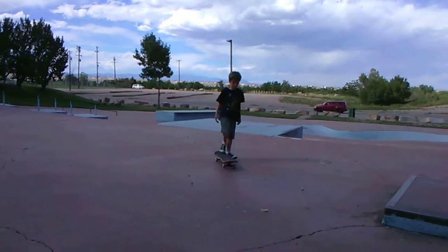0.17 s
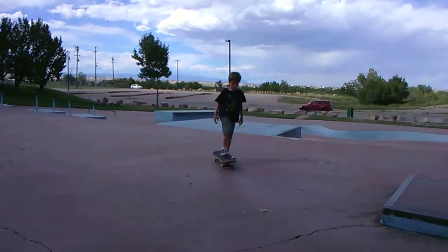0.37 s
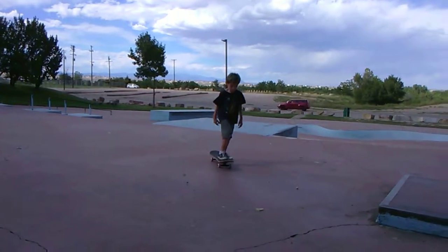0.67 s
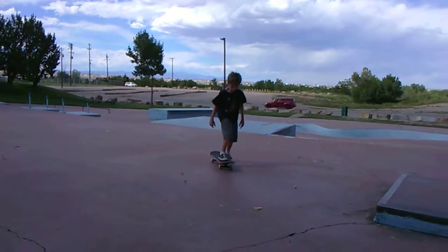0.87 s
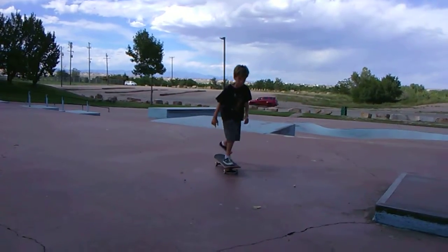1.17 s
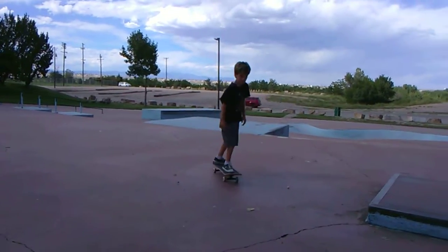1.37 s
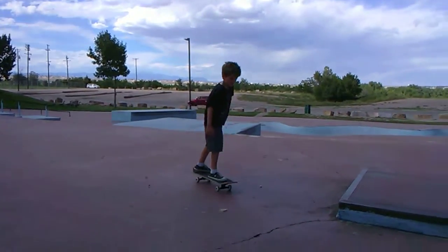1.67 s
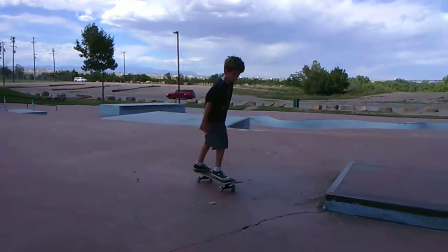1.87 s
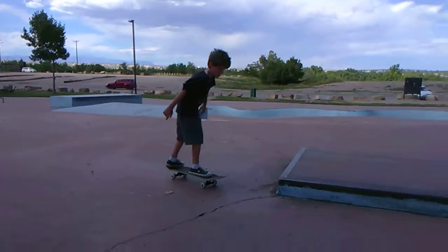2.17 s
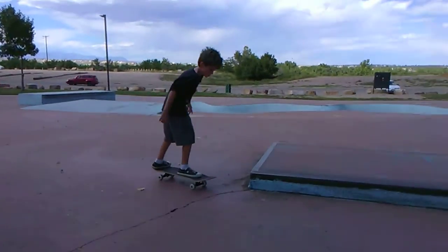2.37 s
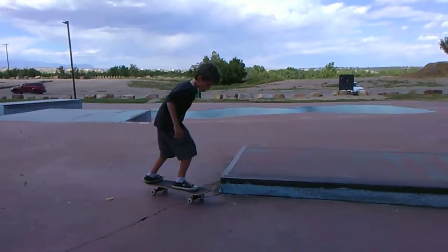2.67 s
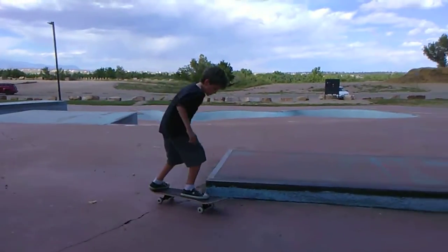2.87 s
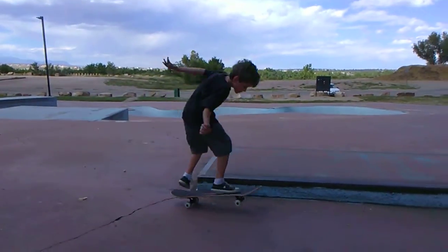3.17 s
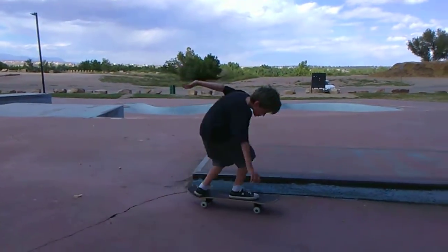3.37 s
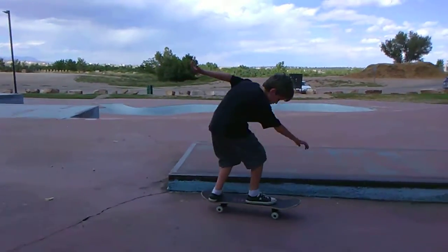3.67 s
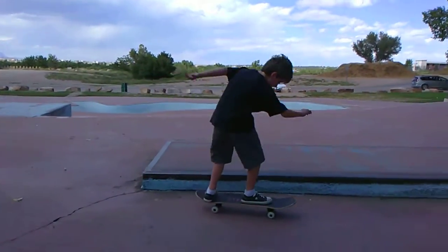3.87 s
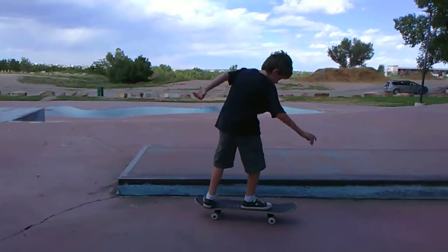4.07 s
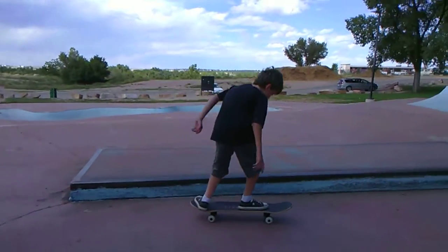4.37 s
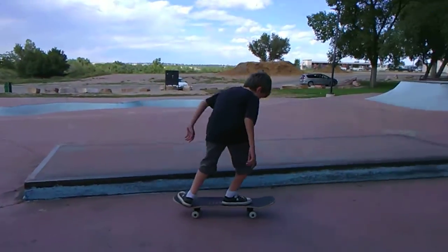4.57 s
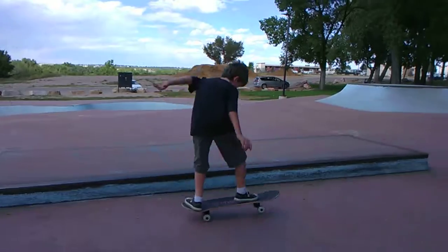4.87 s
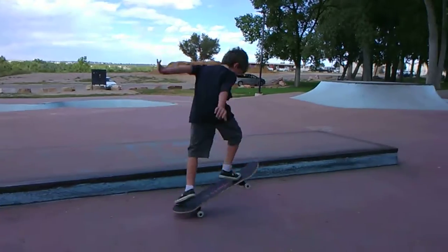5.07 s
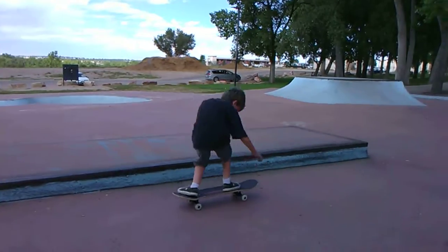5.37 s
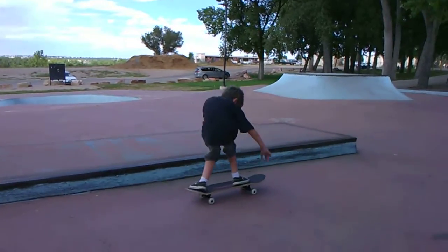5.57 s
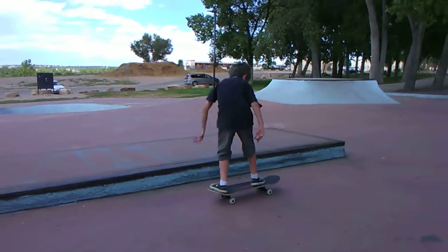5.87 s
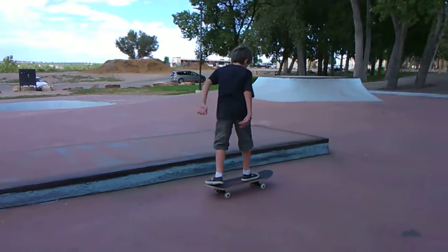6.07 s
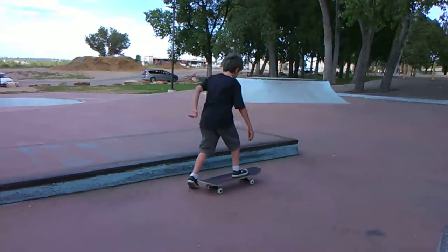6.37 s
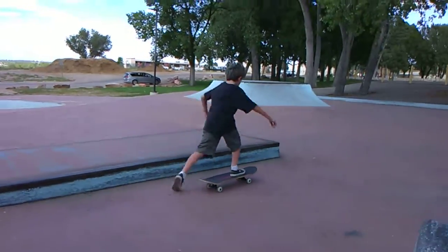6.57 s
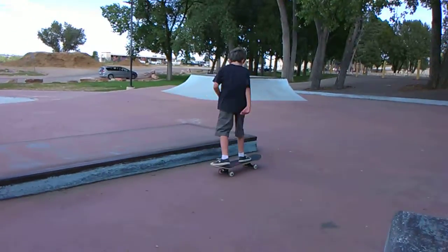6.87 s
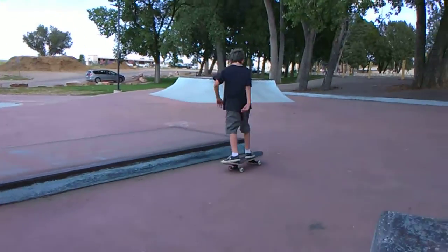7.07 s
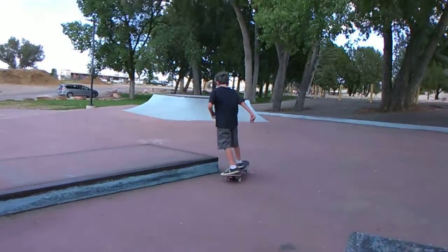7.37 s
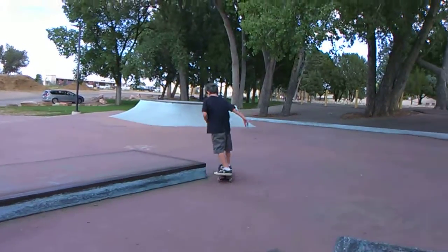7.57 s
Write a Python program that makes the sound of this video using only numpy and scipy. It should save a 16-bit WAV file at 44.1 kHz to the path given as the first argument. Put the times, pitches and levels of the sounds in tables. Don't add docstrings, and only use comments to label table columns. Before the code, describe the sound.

Outdoor concrete skatepark heard through a small stereo camera microphone. From 0 to 1.5 s it is quiet: dull distant air, faint shimmering insects, one pulsing about three times a second, light wheel ticks and low wind puffs on the right. At 1.7 s a gritty sole scuff and woody knock, repeated at 2.15 s, with a small tap at 2.9 s. Rolling roughens around 3.1 s, then at 3.35 s the board slams the concrete: a very loud, dry, woody crack with sand grit and short echo. Soft rolling, small ticks and wind follow. At 5.3-5.4 s comes a second loud slam, brighter, a rapid clatter of several blows. A faint engine hum swells behind. A smaller knock sounds at 6.2 s, when wind turns into heavy thumping buffets, mostly left. Push-off rumble at 6.5 s, then rough rolling, scrapes and crackling clacks at 7.0-7.6 s.

```python
import sys
import numpy as np
from scipy import signal
from scipy.fft import rfft, irfft
from scipy.io import wavfile
from scipy.ndimage import uniform_filter1d

SR = 44100
rng = np.random.default_rng(int(sys.argv[2]) if len(sys.argv) > 2 else 0)


def store_wav(level_fs):
    pcm = np.round(np.clip(np.atleast_2d(level_fs), -1, 1) * 32767)
    wavfile.write(sys.argv[1], SR, pcm.T.astype(np.int16))


def how_loud(loudness_db):
    steps = np.asarray(loudness_db, float) / 20
    return 10 ** steps


N = 340042
TIME = np.arange(N) / SR

# freq_hz, density_db
AIR_COLOUR = [(88, -20), (150, 0), (238, -1), (525, -19), (803, -22), (1300, -38.5), (3160, -22),
              (3480, -30.5), (3900, -31.5), (5850, -33.5), (6700, -21.5), (8300, -26.5), (11500, -31),
              (13600, -31.5), (15100, -61.5)]
# centre_hz, width_hz, first_db, later_db
INSECT_CHOIR = [(3960, 480, -78, -72), (4973, 150, -76, -74.5), (5630, 230, -74.5, -74.5),
                (6130, 150, -76.5, -82)]
# time_s, level_db
ENGINE_DRONE = [(3.2, -78), (3.5, -70), (4.1, -68.5), (5.2, -74.5), (5.5, -58.5), (6.1, -64), (6.4, -94.5)]
# time_s, level_db
THROB_LEVEL = [(0, -73), (2.6, -73), (3.3, -83), (7.71, -86)]
# time_s, left_db, right_db
WIND_LEVEL = [(0, -60.5, -59.5), (.6, -57.5, -56), (.9, -62, -44.5), (1.4, -56, -41.5), (1.6, -72, -63.5),
              (2.0, -54, -59.5), (2.39, -50.5, -50.5), (3.29, -52, -59), (3.56, -58.5, -62),
              (3.7, -36, -44), (4.19, -36, -50.5), (4.49, -56.5, -59), (5.09, -47, -59.5),
              (5.39, -34.5, -49.5), (5.99, -40, -59), (6.29, -43.5, -49), (6.88, -38.5, -35),
              (7.71, -45, -48.5)]
# freq_hz, density_db
GUST_COLOUR = [(20, -22.5), (45, 13), (75, 11), (120, 5), (170, -6), (300, -54)]
# freq_hz, density_db
GUST_EDGE_COLOUR = [(120, -19), (200, 3), (350, -4.5), (600, -12.5), (1000, -30.5), (2000, -61),
                    (5000, -110)]
# peak_s, level_db, pitch_hz, length_s
EDDIES_LEFT = [(2.225, -45.5, 80.1, 0.25), (3.214, -36, 79.4, 0.012), (3.267, -32, 72, 0.029),
               (3.358, -28.5, 120.5, 0.028), (3.665, -34, 79.3, 0.096), (3.92, -33.5, 86.7, 0.018),
               (4.095, -29, 77.4, 0.057), (4.298, -34, 83.6, 0.023), (4.964, -40.5, 95.2, 0.028),
               (5.205, -32, 171, 0.025), (5.361, -23, 139.4, 0.062), (5.423, -26.5, 66, 0.059),
               (5.482, -28.5, 99.8, .015), (5.508, -31.5, 198, 0.015), (5.538, -27, 210.3, 0.021),
               (5.57, -32, 166, 0.012), (5.626, -28, 201.4, 0.016), (5.649, -28.5, 139, 0.013),
               (5.667, -26, 66, 0.033), (5.746, -34.5, 128, 0.016), (5.772, -27, 150.1, 0.015),
               (5.788, -26.5, 100.4, 0.017), (5.97, -30, 85, 0.015), (6.028, -29.5, 86.8, 0.036),
               (6.176, -18.5, 180.1, 0.013), (6.205, -19, 110.2, 0.041), (6.386, -29.5, 210.5, 0.029),
               (6.265, -25.5, 108.3, 0.02), (6.302, -14.5, 120.5, 0.031), (6.342, -20.5, 90.1, 0.027),
               (6.482, -26.5, 167.4, 0.018), (6.611, -27, 120.7, 0.023), (6.693, -19.5, 179.4, 0.024),
               (6.76, -20.5, 214.8, .022), (6.793, -15, 71.9, 0.031), (6.879, -22.5, 198.6, 0.049),
               (6.958, -16, 200.3, 0.018), (6.98, -12.5, 110.1, 0.02), (7.185, -18, 148.4, 0.033),
               (7.213, -16, 167.9, 0.02), (7.352, -23, 82.7, 0.029), (7.54, -32, 231.5, 0.029),
               (7.515, -21.5, 102, 0.016)]
EDDIES_RIGHT = [(.716, -51, 71, 0.012), (.926, -53, 75.5, .014), (.98, -33, 73.5, 0.028),
                (1.125, -30.5, 98.1, 0.026), (1.284, -52, 74, 0.014), (2.374, -42, 91.5, 0.016),
                (2.45, -40.5, 87.8, 0.034), (2.952, -35.5, 94, 0.014), (3.125, -35, 83.2, 0.025),
                (3.354, -25, 143.3, 0.017), (3.671, -38.5, 61.8, 0.13), (4.138, -29, 93.3, 0.027),
                (4.203, -33.5, 101, 0.019), (5.352, -33, 151.1, 0.045), (6.082, -35, 80.9, 0.041),
                (6.365, -34.5, 90, 0.062), (6.572, -29.5, 79.7, 0.024), (6.772, -42.5, 89.7, 0.048),
                (7.026, -22.5, 80.5, 0.033), (7.259, -25, 62, 0.057), (7.345, -35.5, 81.2, 0.022),
                (7.414, -33, 77, 0.0097), (7.475, -29, 88, 0.039), (7.594, -34, 154, 0.011)]
# start_s, level_db, pitch_hz
AIR_SLAPS = [(5.63, -37.5, 490), (6.172, -31, 331.6), (6.209, -23.5, 602), (6.765, -22, 326),
             (6.857, -28.5, 330), (6.899, -29, 606), (6.265, -26, 328), (6.29, -22, 323), (6.296, -16, 330),
             (6.337, -21.5, 329), (6.351, -25, 332), (6.477, -25.5, 333), (6.603, -26, 335),
             (6.693, -24, 337), (6.704, -17.5, 334), (6.956, -16.5, 327.5), (6.975, -19, 342),
             (7.178, -15, 326), (7.184, -15, 336), (7.345, -30, 332), (7.477, -29, 330),
             (7.508, -13.5, 109)]
# freq_hz, gain_db
ECHO_COLOUR = [(300, -8.0), (1500, -10.0), (2900, -1), (4000, -2.0), (8000, -5.0), (14000, -11.0)]
# freq_hz, difference_db
NEAR_PORT_DB = [(300, 1), (2500, 2), (3500, 0), (5500, 1), (7500, 1), (8500, -5), (9500, -13), (10500, -3),
                (11500, 7), (13600, 13)]
# freq_hz, difference_db
FAR_SIDE_PORT_DB = [(2500, 1), (4500, -3), (7500, -10), (9500, -9), (11500, 1), (13600, 5)]
# freq_hz, likeness (1 = same)
PORT_COHERENCE = [(300, .97), (1000, .95), (2000, .8), (4000, .35), (8000, 0.), (14000, -.3)]
# freq_hz, density_db
HOUSING_COLOUR = [(1710, -53), (2900, -18.5), (3130, -13), (3640, -8.5), (3930, -8), (5000, -12.5),
                  (5390, -10.5), (6320, -10.5), (8380, -16), (9560, -4.5), (11500, -12), (13650, -5.5),
                  (15100, -36.5)]
# centre_hz, half_width_hz, depth_db
HOUSING_NOTCHES = [(2944, 61, -14), (3500, 33, -8), (5380, 80, -12), (8360, 170, -7.5), (10850, 87, -8)]
# time_s, level_db
ROLL_LEVEL = [(0, -80.5), (.8, -81), (1.4, -75), (2.1, -72.5), (2.7, -80), (3.2, -65.5), (4.1, -74.5),
              (4.5, -81.5), (5.1, -75), (6.4, -73.5), (7.0, -71), (7.71, -53.5)]
# middle_s, rise_db, half_length_s
ROUGH_PATCHES = [(1.564, 16.5, 0.096), (2.045, 13.5, 0.1), (3.067, 16, 0.11), (3.196, 7, 0.018),
                 (3.318, 8.5, 0.072), (3.432, 12, 0.14), (4.284, 13, 0.095), (4.944, 10.5, 0.16),
                 (5.79, 19, 0.033), (6.486, 17, 0.036), (6.54, 21.5, 0.058), (6.608, 15, 0.041),
                 (6.668, 14.5, 0.027), (6.994, 18, 0.15), (7.091, 16, 0.066), (7.194, 24, 0.096),
                 (7.459, 18.5, 0.1)]
# middle_s, level_db, half_length_s
TRUCK_GROWLS = [(1.43, -65.5, 0.14), (2.963, -73.5, 0.13), (4.913, -62.5, 0.22)]
# centre_hz, width_hz, level_db
WHEEL_MODES = [(555, 190, -7), (1150, 1300, 2), (1500, 240, 0.5), (2200, 970, -6)]
# centre_hz, width_hz, level_db
DECK_MODES = [(381, 69, 0), (645.8, 100, -1), (870, 130, 0.5), (1210, 170, -2.5), (1400, 140, -1),
              (1690, 210, 1.5), (2050, 250, 0.5), (2374, 260, -1)]
# start_s, level_db
SAND_GRAINS = [(0.9795, -57.5), (1.0575, -62.5), (1.1855, -60), (1.452, -49.5), (1.6321, -57),
               (2.4118, -52.5), (2.5641, -59.5), (2.7513, -49.5), (2.7895, -57.5), (2.8661, -53.5),
               (2.9877, -52.5), (3.0812, -25), (3.2001, -47), (3.2391, -54.5), (3.297, -41),
               (3.3316, -33.5), (3.3371, -36.5), (3.3692, -6), (3.5021, -37), (3.5131, -42.5),
               (3.6384, -61), (3.9131, -52.5), (4.3311, -54.5), (4.8148, -46.5), (5.6411, -56.5),
               (5.7888, -50.5), (6.0473, -56.5), (6.2989, -51.5), (7.1941, -27), (7.3181, -21),
               (7.451, -17), (7.2635, -19)]
# start_s, level_db, t60_s, pitch_hz
AFTER_BUZZES = [(3.3466, -22.5, .021, 3450), (3.378, -43.5, .55, 3100), (2.893, -58, .22, 11100),
                (3.088, -48, .1, 11400), (4.025, -60, .3, 12600), (4.821, -62.5, .24, 12900),
                (5.151, -57, .13, 11400), (6.163, -52, .13, 12900), (6.649, -57.5, .21, 11900),
                (4.886, -62, .38, 1520), (6.973, -54.5, .32, 11100), (6.976, -52, .5, 5300),
                (7.475, -48, .4, 5700), (7.485, -41, .3, 10400), (7.255, -53, .4, 5500),
                (5.412, -45, .42, 2650), (7.653, -46.5, .36, 10400), (7.272, -50, .32, 10900),
                (1.7, -47, .3, 5700), (6.2, -51, .25, 5700)]
# start_s, wood_db, grit_over_wood_db, pitch_hz
CRACK_TICKS = [(.0568, -33, -6, 1740), (.1378, -34.5, -24, 1680), (.7515, -39, -29, 1650),
               (1.0195, -37, -38, 1540), (1.081, -39, -39, 1690), (1.4172, -44.5, -26, 2200),
               (1.5404, -39.5, -37, 1500), (1.336, -53, -10, 2480), (1.3678, -51.5, -21, 2570),
               (2.0467, -46, -22, 1640), (2.44, -55, -1, 1150), (3.1968, -38, -26.5, 2220),
               (3.2826, -37, -16.5, 2200), (4.0155, -31, -11.5, 1270), (4.0643, -53, 2, 1495),
               (4.2783, -47, -7.5, 1580), (4.106, -48, -21, 2032), (5.137, -34, 1.5, 2012),
               (5.767, -43, -18, 1165), (5.8675, -50, -7, 1482), (5.9663, -52, -2.5, 1528),
               (6.4413, -42, -18, 1063), (6.5915, -37.5, -19, 974), (6.639, -42, 4, 2110),
               (6.641, -39, -32, 870), (6.519, -37, -20, 870), (6.528, -39, -25, 803),
               (6.549, -44, -15, 850), (6.61, -47, -17, 1710), (7.0658, -31.5, -25, 1660),
               (7.263, -20.5, -3.5, 2050), (7.3175, -58, 21, 1500), (7.455, -22.5, -29, 706),
               (7.705, -45, 11, 1710), (3.0126, -51, -22, 1710), (3.038, -38, -34, 750),
               (3.065, -35, -33, 890), (3.297, -40.5, -9.5, 900), (5.787, -53, 1, 1400),
               (4.18, -53, -12.5, 2005), (3.3685, -15.5, -9, 1710), (.0715, -48, -30, 1690),
               (1.6835, -33.5, 15, 2050), (1.7185, -42, 11, 2050), (5.725, -48.5, -30, 870),
               (6.975, -40.5, -3, 1500), (7.0113, -26, -24.5, 1060), (7.1355, -37, -40, 1276),
               (7.4305, -28.5, -32, 1694), (7.4505, -23.5, 8.5, 1400), (7.5847, -37, -27, 1720)]
# start_s, wood_db, grit_over_wood_db, pitch_hz, drag_s
SOLE_SCUFFS = [(1.668, -18, 5.5, 1260, 0.015), (1.68, -20, 6, 2200, 0.011),
               (1.694, -28.5, -6.5, 1720, 0.0036), (2.131, -18, 5.5, 1600, 0.003),
               (2.14, -20.5, -2.5, 1000, 0.0034), (2.152, -22, -15, 1810, 0.0021),
               (3.079, -26.5, -14, 935, 0.0065), (3.186, -41, -30, 993, .018),
               (6.98, -34.5, -18, 795, 0.021), (7.055, -37, -25, 870, 0.02), (7.112, -43, -44, 870, 0.012),
               (7.087, -33, -14, 870, 0.0096), (7.186, -25.5, -3.5, 1400, 0.0085),
               (7.2, -21.5, 0, 1500, 0.0188), (7.223, -20.5, -1, 1580, 0.014),
               (7.441, -32.5, 7, 1500, 0.0056), (7.458, -29, -2, 1250, 0.012),
               (7.474, -33.5, -8, 1114, 0.008), (7.612, -12.5, -6.5, 1500, 0.0055),
               (7.624, -17, -2.5, 1620, 0.012), (7.643, -20, -1, 1500, 0.0011),
               (7.615, -39, -15, 700, 0.0092)]
# start_s, wood_db, crack_over_wood_db, grit_over_wood_db, pitch_hz
DECK_SLAMS = [(1.724, -25, -5, -6, 1500), (1.8946, -34.5, -15, -26, 1500), (2.1605, -25, -6.5, -3, 1590),
              (2.8805, -34.5, -26, -14, 1280), (3.9419, -37, -20, -38.5, 1500),
              (4.9787, -38, -20, -16.5, 1500), (3.327, -32.5, -18.5, -25, 1003),
              (3.342, -22.5, -15, -18, 638), (3.346, 1.5, -4, -5, 702), (3.351, -5, -12, 3.5, 636.7),
              (3.373, -27, -5.5, -4, 2000), (3.426, -39.5, 5, 7, 627), (3.502, -75, 0, 18, 2000),
              (5.313, -27.5, -12, -19.5, 900), (5.319, 3, -7, -2.5, 1654), (5.335, -3.5, 1, -5.5, 1673),
              (5.3497, -3, -3.5, 3.5, 1889), (5.3865, -4.5, -7, 2, 1498), (5.401, -18, -28, -2, 1150),
              (6.159, -33.5, -24, -22, 470), (6.1938, -20, -8, -2, 1700), (5.328, -10, -7.5, -2.5, 2067),
              (5.343, -17.5, -10.5, 0, 1910), (5.36, -11, -7.5, -1, 1693), (3.357, -14.5, -10, 1, 900)]


def unit(x):
    return x / np.sqrt(np.mean(x ** 2))


def curves(table):
    time_s, *columns = np.transpose(table)
    return [np.interp(TIME, time_s, column) for column in columns]


def read(table, hz):
    freq_hz, value = np.array(table)[:, 0], np.array(table)[:, 1]
    return np.interp(np.log(hz + 1), np.log(freq_hz + 1), value)


def colour(x, db_of_hz):
    size = 4096
    cepstrum = irfft(np.log(how_loud(db_of_hz(np.arange(size // 2 + 1) * SR / size))))
    cepstrum[1:size // 2] *= 2
    cepstrum[size // 2 + 1:] = 0
    taps = irfft(np.exp(rfft(cepstrum)))
    taps = taps / np.sqrt(np.sum(taps ** 2))
    return signal.fftconvolve(np.atleast_2d(x), taps[None], axes=1)[:, :N]


def ring(x, modes):
    t = np.arange(2048) / SR
    taps = np.zeros(len(t))
    for k, (hz, width_hz, db) in enumerate(modes):
        decay = np.exp(-np.pi * width_hz * t)
        taps += (-1) ** k * how_loud(db) * np.sqrt(width_hz) * decay * np.sin(2 * np.pi * hz * t)
    taps = taps / np.sqrt(np.sum(taps ** 2))
    return signal.fftconvolve(x, taps[None], axes=1)[:, :x.shape[1]]


def walk(rate, channels=1):
    k = int(SR / rate)
    held = np.repeat(rng.standard_normal((channels, N // k + 1)), k, axis=1)
    return unit(uniform_filter1d(uniform_filter1d(held, k), k)[:, :N])


def port_noise():
    mid, side = rfft(rng.standard_normal((2, N)))
    like = np.clip(read(PORT_COHERENCE, np.arange(len(mid)) * SR / N), -1, 1)
    mid = mid * np.sqrt((1 + like) / 2)
    side = side * np.sqrt((1 - like) / 2)
    return irfft(np.array([mid + side, mid - side]), N)


def grit(rate, scatter_db):
    return unit(port_noise() * how_loud(scatter_db * walk(rate)))


def bump(middle_s, half_s):
    return np.clip(1 - np.abs(TIME - middle_s) / half_s, 0, 1)


def below(hz, edge_hz, octaves):
    return -40 * np.clip(.5 + np.log2((hz + 1) / edge_hz) / octaves, 0, 1) ** 2


def shimmer(hz, width_hz):
    phase = 2 * np.pi * np.cumsum(hz * (1 + .012 * walk(1.5)[0])) / SR
    pole = np.exp(-np.pi * width_hz / SR)
    slow = signal.lfilter([1], [1, -pole], rng.standard_normal((2, 2, N)))
    return unit(slow[0] * np.cos(phase) + slow[1] * np.sin(phase))


def distant_air():
    return how_loud(-66.5 + 1.5 * walk(4)) * colour(port_noise(), lambda hz: read(AIR_COLOUR, hz))


def engine_drone():
    return how_loud(curves(ENGINE_DRONE)[0]) * ring(port_noise(), [(231, 7.6, 2), (349, 1.2, -5.5)])


def insect_choir():
    choir = np.zeros((2, N))
    for hz, width_hz, first_db, later_db in INSECT_CHOIR:
        level_db = np.interp(TIME, [1, 2.2, 5.8, 7], [first_db, later_db, later_db, later_db - 5])
        choir += how_loud(level_db + 2 * walk(2) + 1.5 * walk(11)) * shimmer(hz, width_hz)
    return choir


def throbbing_insect():
    first_s, period_s, length_s = .29, .325, .04
    from_beat_s = (TIME - first_s + period_s / 2) % period_s - period_s / 2
    pulse = np.exp(-.5 * (from_beat_s / length_s) ** 2) * how_loud(curves(THROB_LEVEL)[0])
    return pulse * ring(rng.standard_normal((2, N)), [(6800, 1500, 0.0046), (8050, 980, 0.015)])


def background():
    return distant_air() + engine_drone() + insect_choir() + throbbing_insect()


def eddies(events):
    swing, edge = np.zeros((2, N))
    wobble, flutter = walk(90)[0], how_loud(3.5 * walk(80)[0])
    churn = colour(rng.standard_normal(N), lambda hz: read(GUST_COLOUR, hz / 2.1))[0]
    jolts = how_loud(6 * walk(160)[0]) * rng.standard_normal(N)
    for s, db, hz, length_s in events:
        at = slice(max(int((s - .15) * SR), 0), int((s + 0.2) * SR))
        late = (TIME[at] - s) / max(length_s, .01) + .15
        bell = np.exp(-np.where(late < 0, 5, 1.8) * late ** 2)
        cycles = np.sin(2 * np.pi * np.cumsum(hz * np.exp(.3 * wobble[at])) / SR)
        churn_share = np.clip((hz - 70) / 90, .25, 1)
        motion = bell * flutter[at] * (cycles + churn_share * churn[at])
        size = how_loud(db) * np.sqrt(np.mean(bell ** 2))
        swing[at] += size * unit(motion)
        edge_gain = how_loud(-17 + .7 * (db + 20)) * (hz / 100) ** .7
        edge[at] += size * unit(bell * jolts[at]) * edge_gain
    return swing + colour(edge, lambda hz: read(GUST_EDGE_COLOUR, hz))[0]


def air_slaps():
    gain_db, length_cycles, steepness = 6.5, 0.42, 5
    total = np.zeros(N)
    for s, db, hz in AIR_SLAPS:
        turn = (TIME - s) * hz - .75
        total += how_loud(db + gain_db) * np.exp(-(turn / length_cycles) ** 2) * -np.tanh(steepness * turn)
    return total


def wind():
    rumble = colour(rng.standard_normal((2, N)), lambda hz: read(GUST_COLOUR, hz))
    bed = unit(rumble * how_loud(2.8 * walk(14, channels=2)))
    single = np.array([eddies(EDDIES_LEFT) + air_slaps(), eddies(EDDIES_RIGHT)])
    blown = how_loud(np.array(curves(WIND_LEVEL))) * bed + single
    return signal.sosfilt(signal.butter(2, 38, "high", fs=SR, output="sos"), blown)


def park(x):
    ramps_t60_s, trees_t60_s, delay_s = 0.2, 0.098, 0.0094
    t = np.arange(SR // 2) / SR
    onset = np.clip(t / delay_s, 0, 1) ** 2
    scatter = port_noise()[:, :len(t)] * onset
    ramps = scatter * how_loud(-60 * t / ramps_t60_s)
    trees = ring(scatter[:, ::-1] * onset * how_loud(-19 - 60 * t / trees_t60_s), [(2900, 2400, 0)])
    echoes = (ramps + trees) / np.sqrt(np.sum(ramps[0] ** 2))
    wet = signal.fftconvolve(x, echoes, axes=1)[:, :N]
    return how_loud(-18.5) * colour(wet, lambda hz: read(ECHO_COLOUR, hz))


def notches(hz):
    return sum(db * np.exp(-((hz - centre_hz) / width_hz) ** 2) for centre_hz, width_hz, db in HOUSING_NOTCHES)


def shade(x, table):
    def share_db(hz, side):
        return 10 * np.log10(2 / (1 + how_loud(-2 * side * read(table, hz))))
    left = colour(x[0], lambda hz: share_db(hz, 1))[0]
    right = colour(x[1], lambda hz: share_db(hz, -1))[0]
    return np.array([left, right])


def wheel_rumble(level_db, rolling):
    rumble = ring(how_loud(level_db) * rolling, WHEEL_MODES)
    return signal.sosfilt(signal.butter(6, 2580, fs=SR, output="sos"), rumble)


def deck_hum(smooth_db, patch_db, rolling):
    patch_gain, first_db, fade_db_per_s = 1.4, -62, 26.5
    gain = how_loud(smooth_db - 9 + patch_gain * patch_db) + how_loud(first_db - fade_db_per_s * TIME)
    return ring(gain * how_loud(2.8 * walk(14)) * rolling, [(734, 40, 0.005), (900, 58, 0.0045)])


def truck_growl():
    gain = sum(how_loud(db) * bump(s, half_s) for s, db, half_s in TRUCK_GROWLS)
    return ring(gain * grit(57, 2.2), [(523, 370, 0)])


def after_buzz(shake):
    width_hz = 1400
    total = np.zeros((2, N))
    for s, db, t60_s, hz in AFTER_BUZZES:
        force = how_loud(db - 60 * np.clip(TIME - s, 0, 1) / t60_s) * (TIME >= s)
        total += colour(force * shake, lambda f: -np.minimum(6 * ((f - hz) / width_hz) ** 2, 60))
    return total


def sand_grains():
    gain_db, t60_s = -7, 0.0093
    total = np.zeros(N)
    for s, db in SAND_GRAINS:
        total += how_loud(db + gain_db - 60 * np.clip(TIME - s, 0, .1) / t60_s) * (TIME >= s)
    return total


def crack_band(hz):
    return read(HOUSING_COLOUR, hz) + below(hz, 8400 * 1.1, .4)


def grit_band(hz):
    return read(HOUSING_COLOUR, hz) + below(8400, hz * 1.1 + 1, .4)


def sand_crackle(contact_force, roll_db, patch_db):
    pebbles = unit(how_loud(1.5 * walk(150)))
    rolled = how_loud(roll_db - 7 + 0.15 * patch_db) * pebbles
    return colour((contact_force + sand_grains() + rolled) * grit(2200, 3.5), grit_band)


def contacts(events, deck, rise_s, hold_s, t60_s, focus_db, blow, shake):
    wood, power = np.zeros((2, N)), np.zeros((2, N))
    detune = 1 + .02 * rng.standard_normal((60, len(deck)))
    knocks_db = 4.5 * walk(160)[0]
    tail_db, tail_stretch = -15, 1.9
    for (s, wood_db, crack_db, grit_db, hz), hold, t60, stray in zip(events, hold_s, t60_s, detune):
        at = slice(int(s * SR), int((s + 0.15) * SR))
        t = TIME[at] - s
        fall_db = -60 * np.maximum(t - rise_s - abs(hold), 0) / max(t60, .005)
        shiver = how_loud(tail_db + fall_db / tail_stretch + knocks_db[at])
        force = how_loud(wood_db) * np.clip(t / rise_s, 0, 1) * np.maximum(how_loud(fall_db), shiver)
        modes = []
        for (mode_hz, width_hz, db), d in zip(deck, stray):
            octaves_off = min(abs(np.log2(mode_hz / hz)), 2.2)
            modes.append((mode_hz * d, width_hz, db - focus_db * octaves_off))
        drive = force * shake[:, at]
        drive[:, int(rise_s * SR)] += blow * np.sqrt(np.sum(force ** 2))
        rung = ring(drive, modes)
        wood[:, at] += rung * np.sqrt(2 * np.sum(force ** 2) / np.sum(rung ** 2))
        power[:, at] += (how_loud(np.array([[crack_db], [grit_db]])) * force) ** 2
    return wood, power


def with_crack(events, crack_db):
    s, wood_db, grit_db, hz = np.transpose(events)[:4]
    return np.transpose([s, wood_db, crack_db + 0.71 * grit_db, grit_db, hz])


def wheel_ticks(deck, shake):
    hold_s, t60_s = np.full(len(CRACK_TICKS), .004), np.full(len(CRACK_TICKS), .034)
    return contacts(with_crack(CRACK_TICKS, -11), deck, 0.0018, hold_s, t60_s, 20, 0.52, shake)


def sole_scuffs(deck, shake):
    drag_s, t60_s = np.array(SOLE_SCUFFS)[:, -1], np.full(len(SOLE_SCUFFS), 0.011)
    return contacts(with_crack(SOLE_SCUFFS, -8), deck, 0.0062, drag_s, t60_s, 8.5, 0.31, shake)


def deck_slams(shake):
    t60_s = 0.03 * how_loud(-0.05 * np.array(DECK_SLAMS)[:, 1])
    hold_s = np.full(len(DECK_SLAMS), .003)
    return contacts(DECK_SLAMS, DECK_MODES, .0006, hold_s, t60_s, 5.9, 0.59, shake)


def skateboard():
    shake, rolling = grit(600, 2.5), grit(120, 4)
    damped = DECK_MODES[:1] + DECK_MODES[2:]
    tick_wood, tick_power = wheel_ticks(damped, shake)
    scuff_wood, scuff_power = sole_scuffs(damped, shake)
    slam_wood, slam_power = deck_slams(shake)
    crack, sand = np.sqrt(slam_power + scuff_power + tick_power) * how_loud(-9.5)
    high_pass = signal.butter(4, 310, "high", fs=SR, output="sos")
    wood = signal.sosfilt(high_pass, slam_wood + scuff_wood + tick_wood)
    hits = how_loud(-12.5) * wood + colour(crack * grit(900, 2.2), crack_band)
    patch_db = sum(db * bump(s, half_s) for s, db, half_s in ROUGH_PATCHES)
    smooth_db = curves(ROLL_LEVEL)[0]
    roll_db = smooth_db + 2.5 * walk(30)
    rolled = wheel_rumble(roll_db + patch_db, rolling) + deck_hum(smooth_db, patch_db, rolling)
    return rolled + truck_growl() + after_buzz(shake) + sand_crackle(sand, roll_db, patch_db) + hits


def scene():
    skate = skateboard()
    heard = colour(skate + park(skate), notches)
    return shade(background(), FAR_SIDE_PORT_DB) + wind() + shade(heard, NEAR_PORT_DB)


def roll_off(x):
    return signal.sosfilt(signal.butter(12, 15210, fs=SR, output="sos"), x)


def record(dry):
    cut = signal.sosfilt(signal.ellip(7, .5, 62, 14150, fs=SR, output="sos"), dry)
    rounded = np.clip(np.tanh(1.192 * cut) / 0.91, -1, 1)
    return roll_off(rounded)


dry = scene()
out = record(dry)
store_wav(out)
```